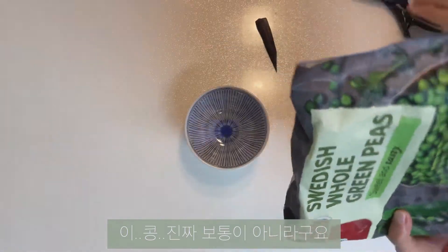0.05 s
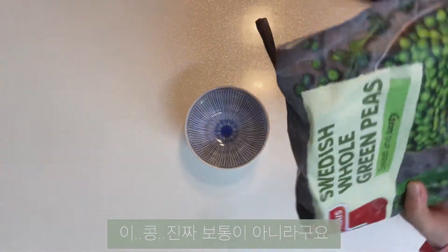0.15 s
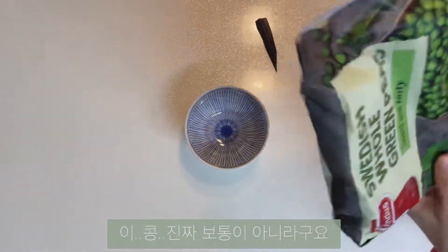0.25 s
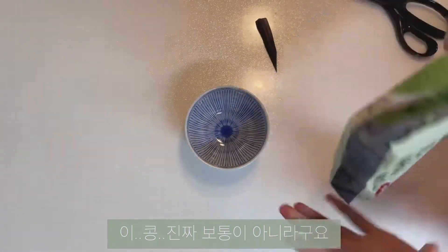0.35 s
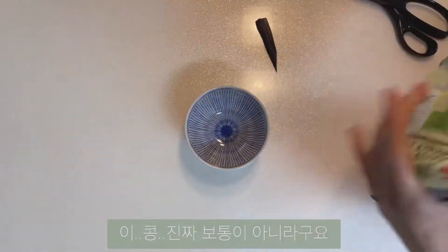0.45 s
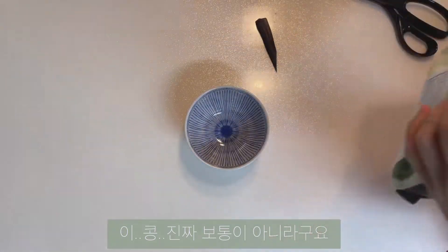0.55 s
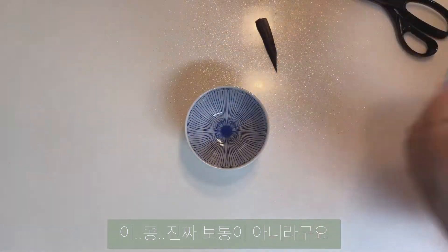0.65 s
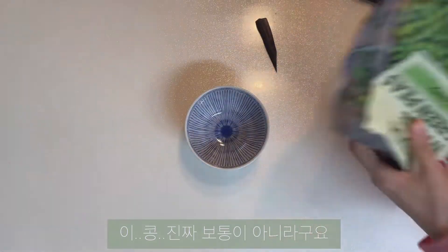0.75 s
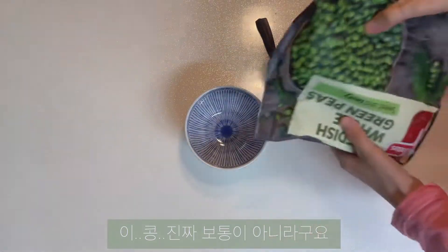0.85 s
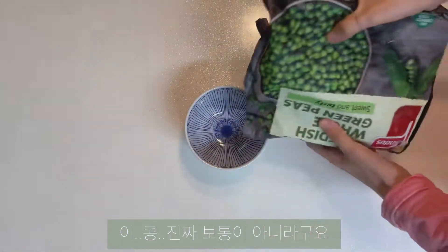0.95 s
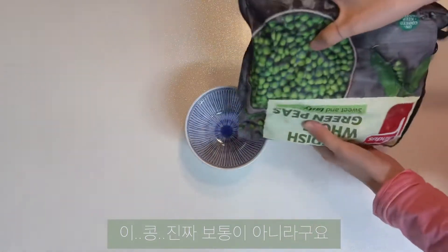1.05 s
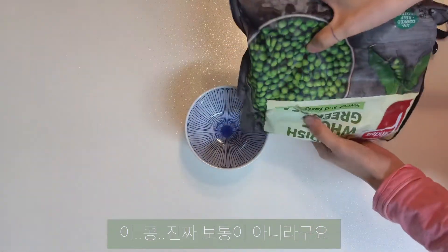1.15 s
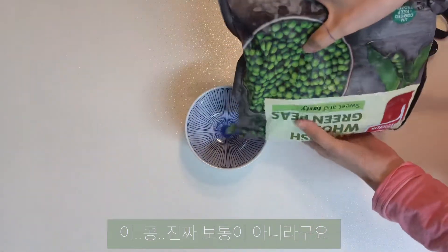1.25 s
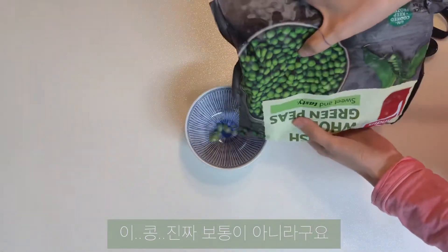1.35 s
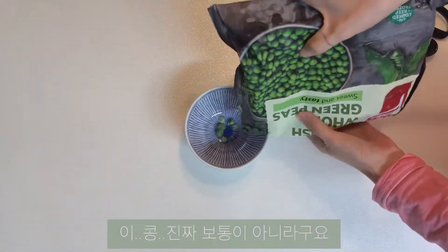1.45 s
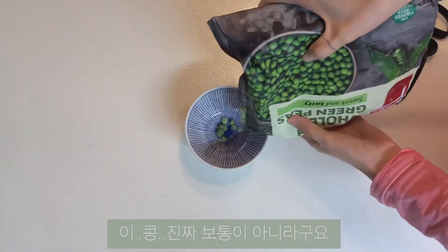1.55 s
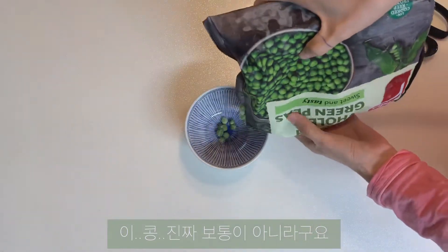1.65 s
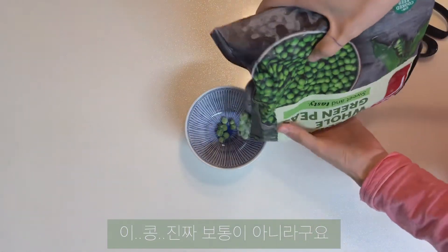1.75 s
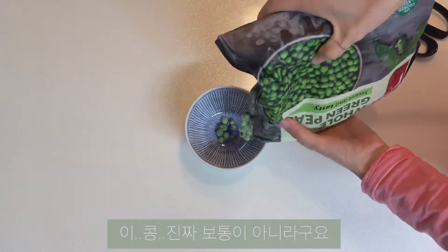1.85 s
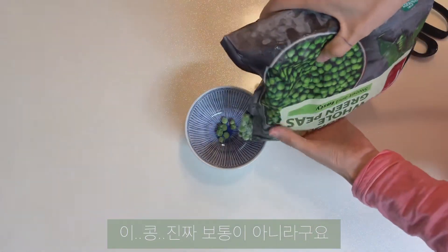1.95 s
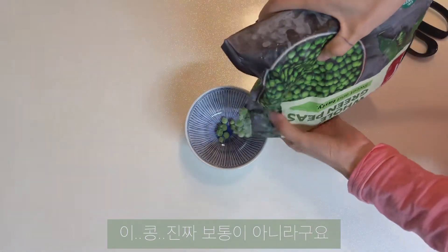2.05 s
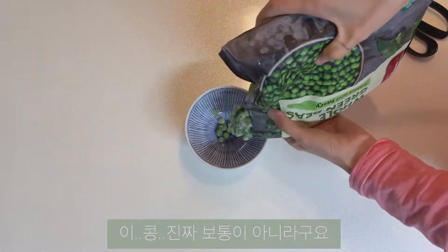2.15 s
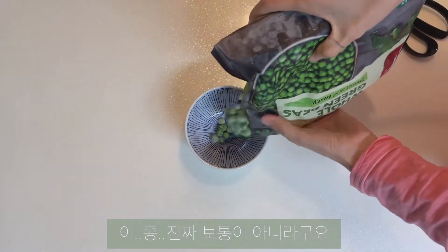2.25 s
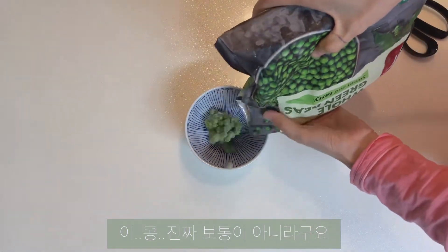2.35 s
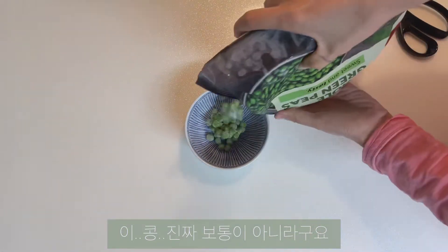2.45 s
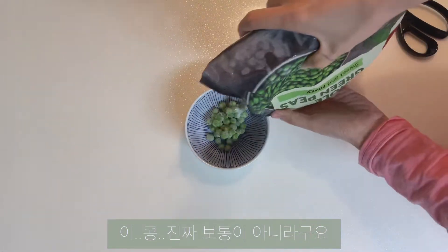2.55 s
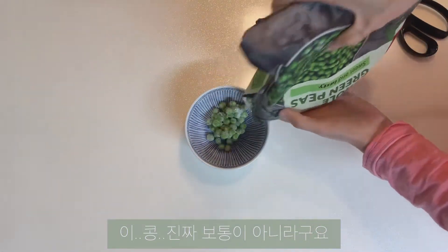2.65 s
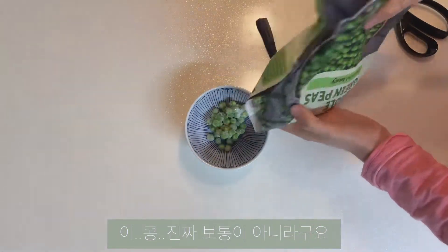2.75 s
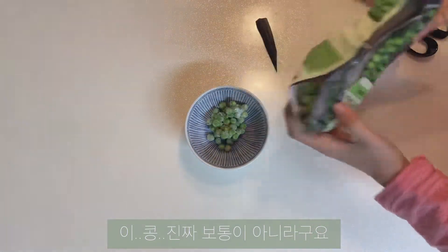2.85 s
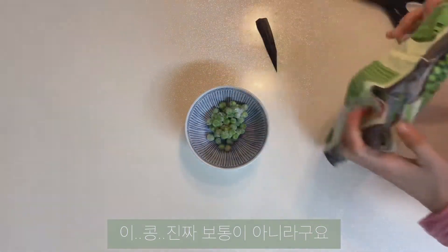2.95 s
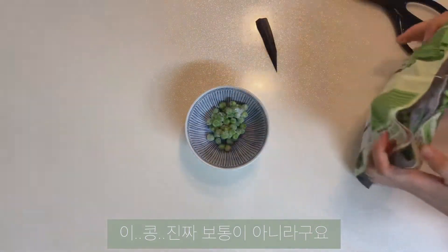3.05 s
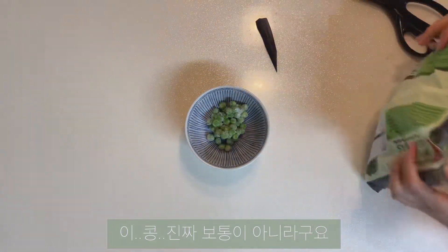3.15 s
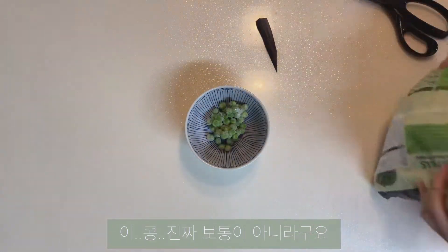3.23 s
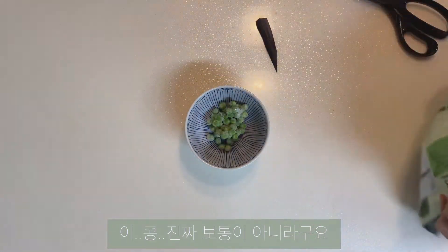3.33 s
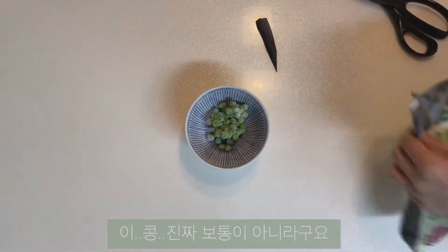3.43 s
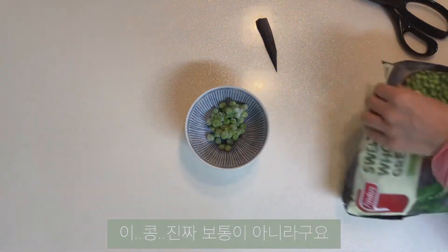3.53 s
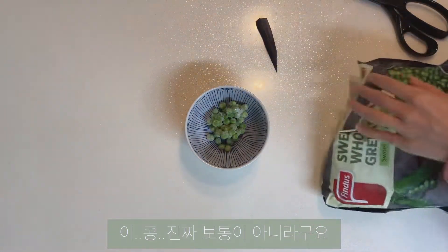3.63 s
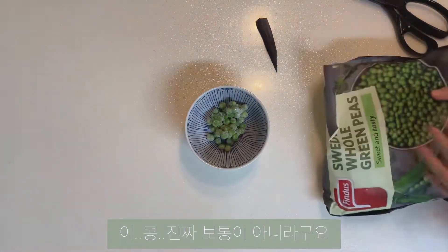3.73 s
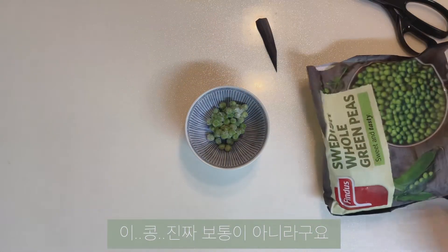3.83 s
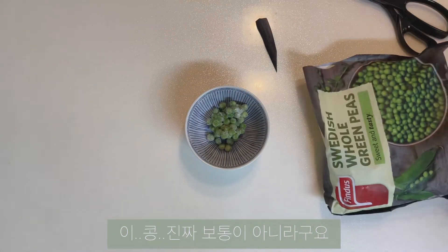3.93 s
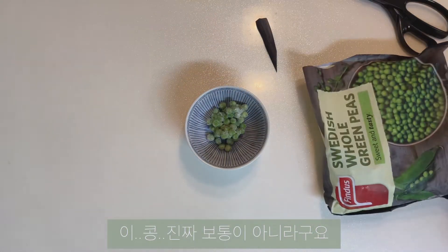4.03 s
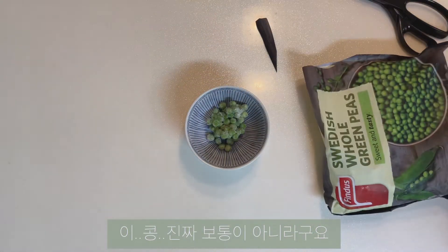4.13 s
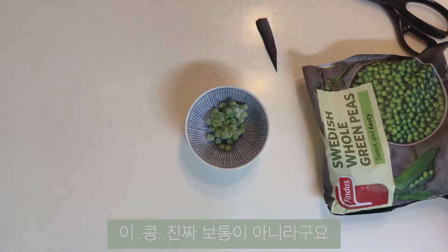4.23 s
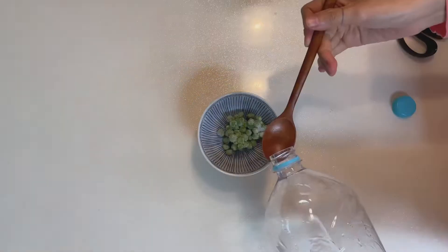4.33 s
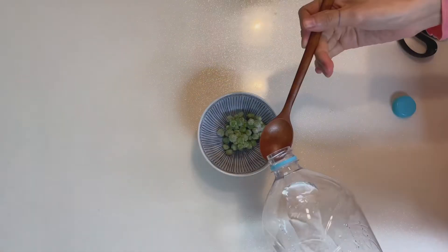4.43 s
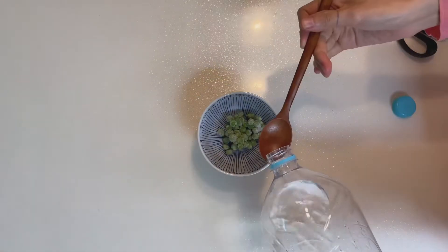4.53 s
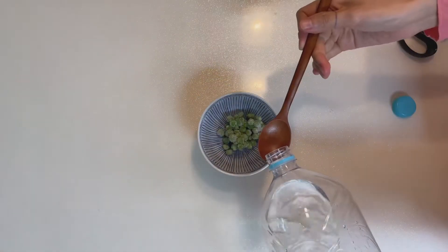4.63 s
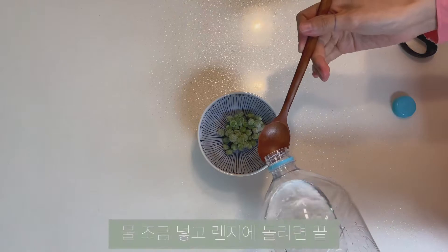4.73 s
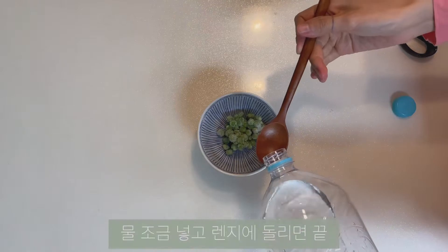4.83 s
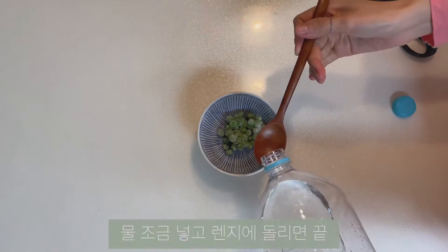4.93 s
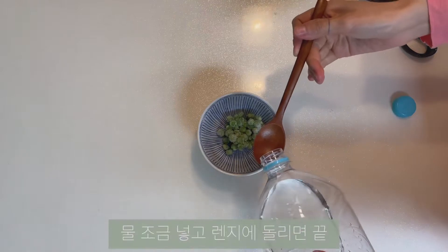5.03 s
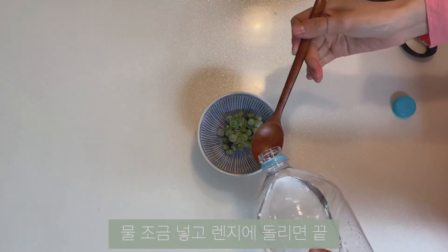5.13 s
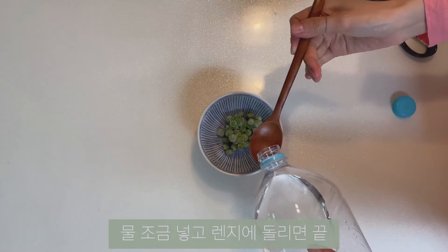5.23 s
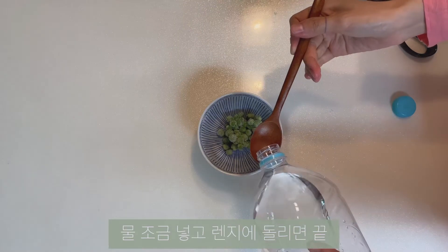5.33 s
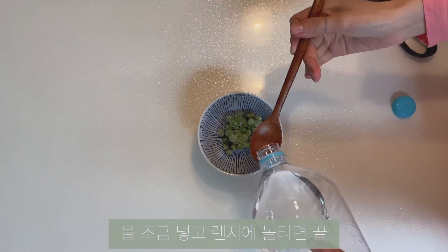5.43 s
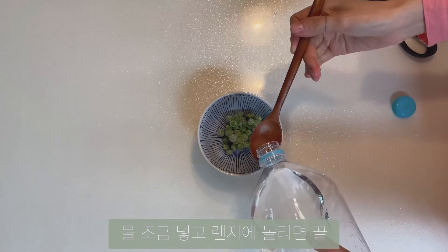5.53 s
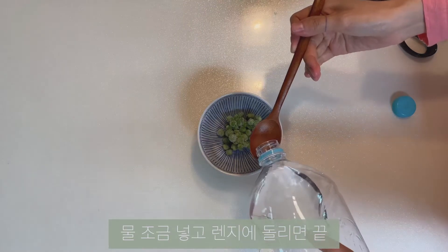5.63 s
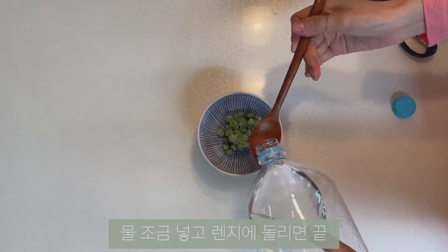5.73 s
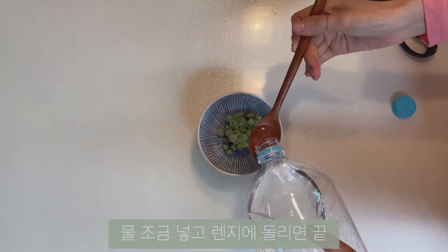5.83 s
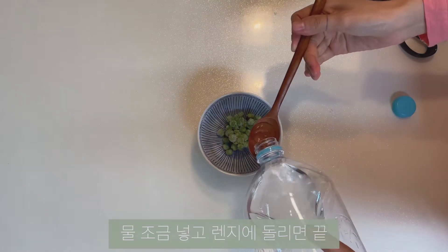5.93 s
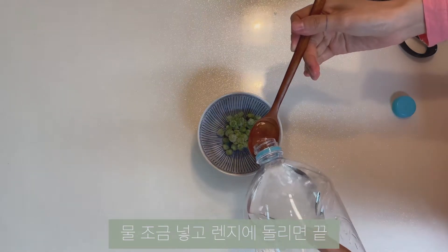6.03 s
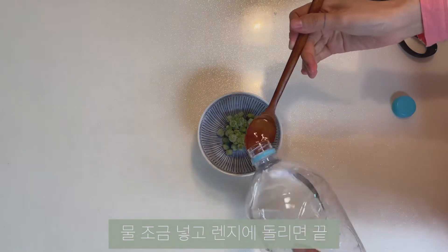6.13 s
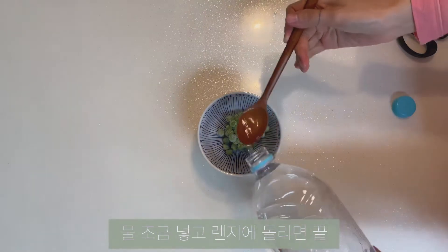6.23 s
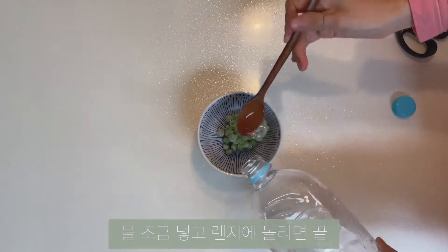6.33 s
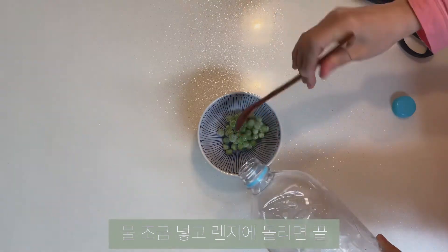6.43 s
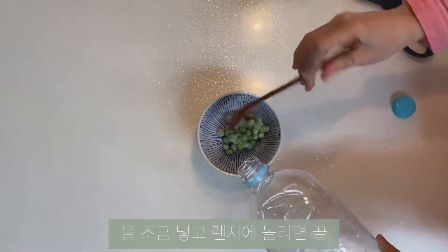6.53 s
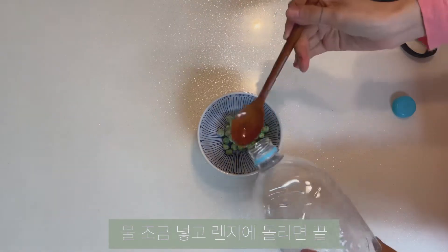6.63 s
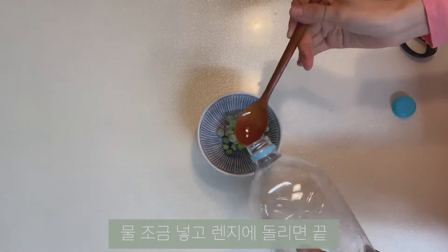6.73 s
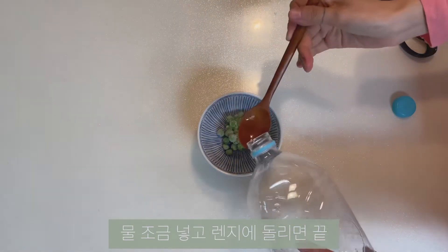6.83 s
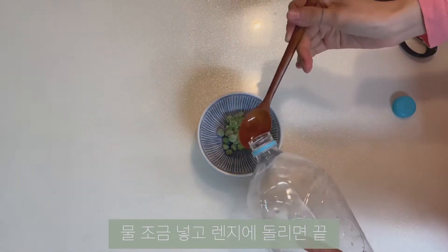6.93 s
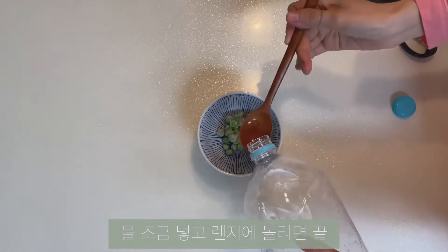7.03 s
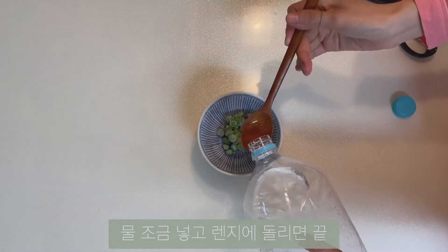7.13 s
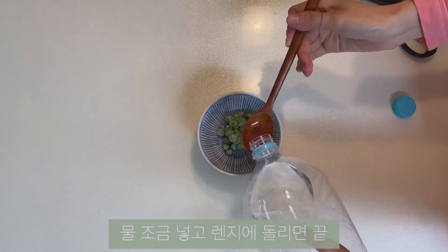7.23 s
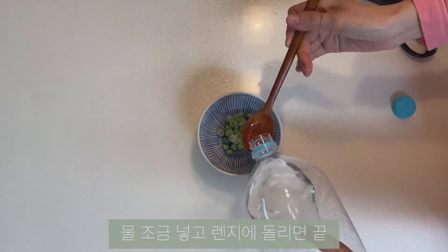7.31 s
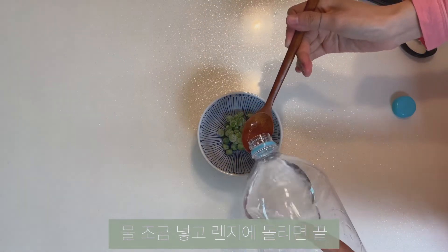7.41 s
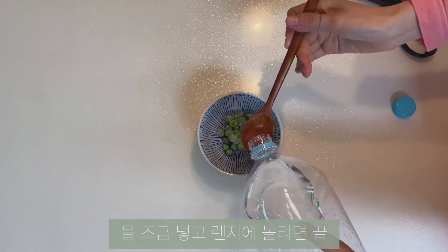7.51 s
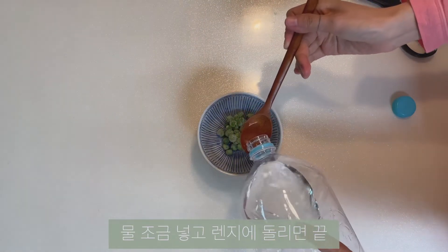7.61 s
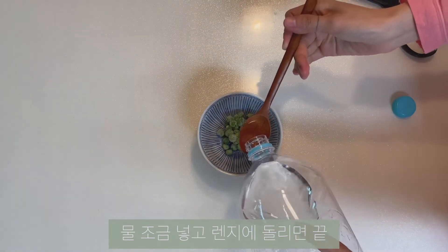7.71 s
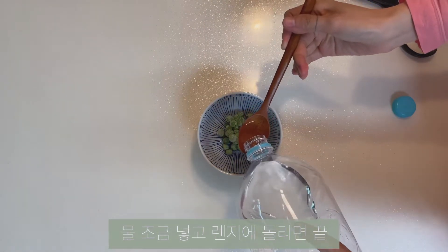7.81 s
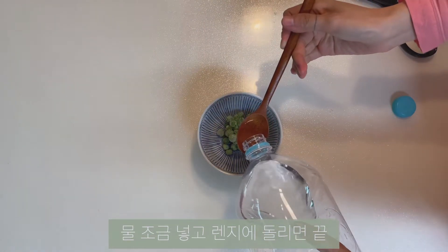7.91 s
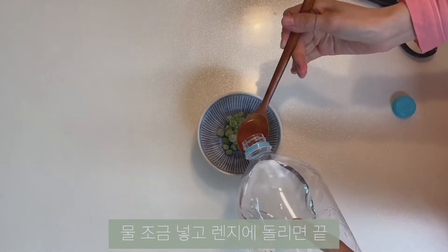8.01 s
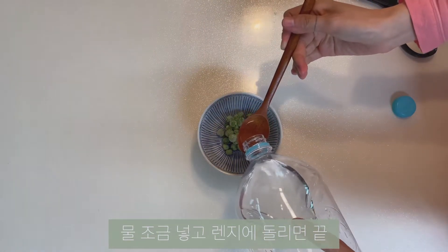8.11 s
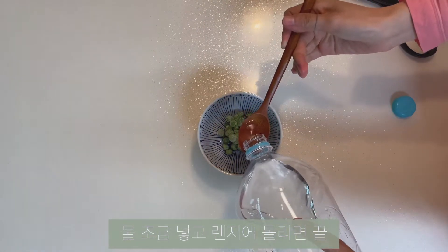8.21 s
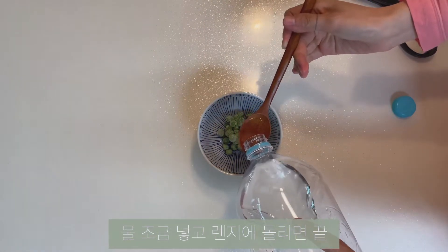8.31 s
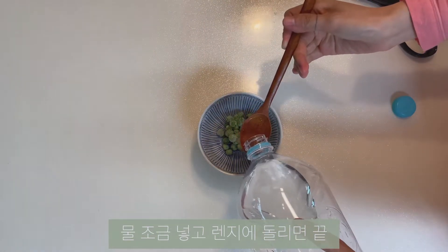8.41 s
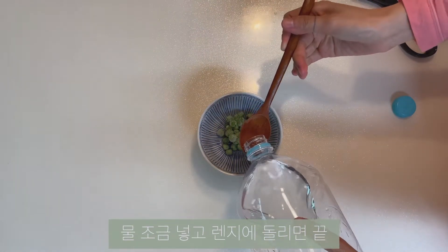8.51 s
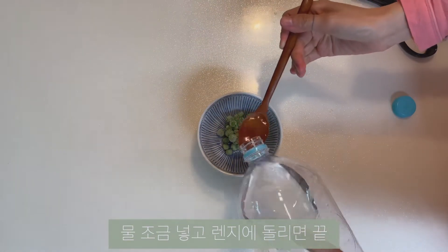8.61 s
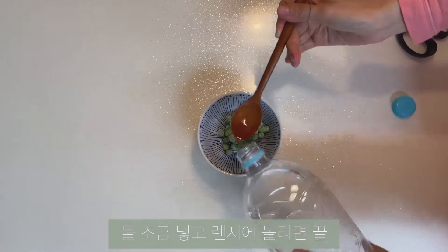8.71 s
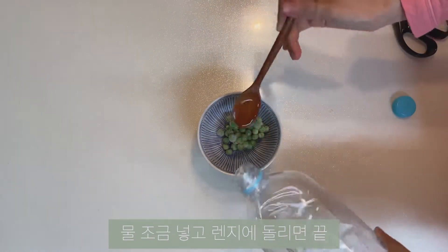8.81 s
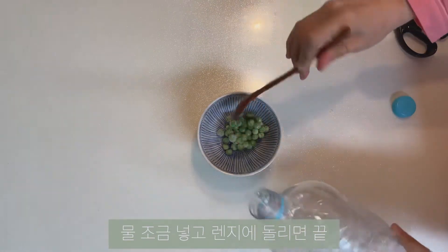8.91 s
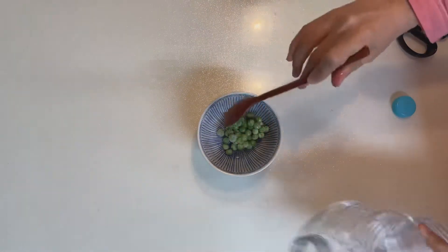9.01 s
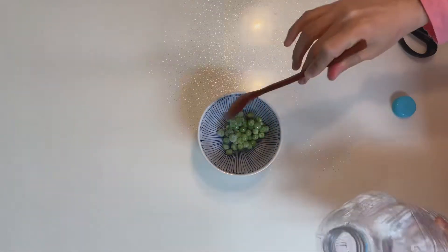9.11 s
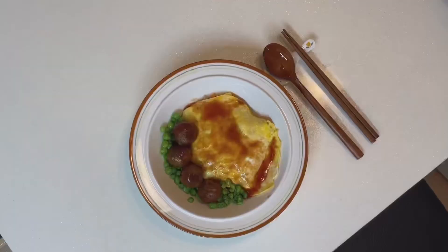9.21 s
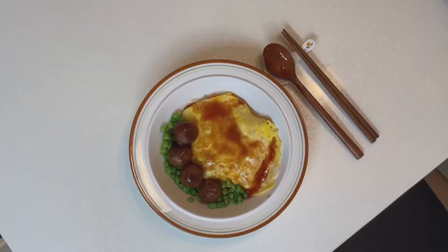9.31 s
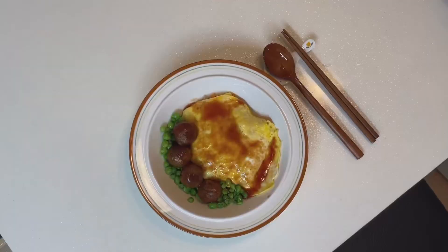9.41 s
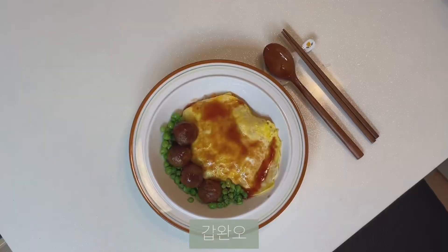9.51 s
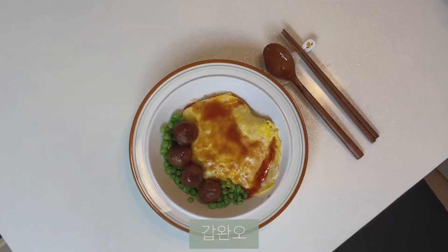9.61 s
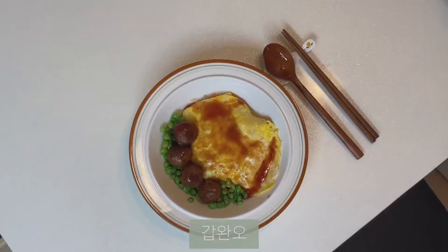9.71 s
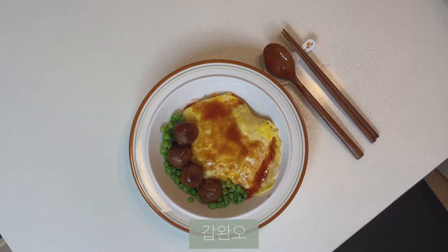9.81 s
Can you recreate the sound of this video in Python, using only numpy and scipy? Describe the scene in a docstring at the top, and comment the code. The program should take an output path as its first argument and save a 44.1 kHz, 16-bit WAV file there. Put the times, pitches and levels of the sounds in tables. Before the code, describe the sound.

In a small dry kitchen, hands squeeze and tip a plastic bag of frozen peas close to the microphone: dense, bright crackles and snaps, with two faint clear pings from a ceramic bowl. The bag is put down and falls quiet after four seconds. Later a wooden spoon taps and scrapes the bowl, a plastic bottle ticks and gulps once, and taps return near nine seconds. A low fridge hum stays underneath.

```python
"""A plastic bag of frozen peas crackles and snaps as it is squeezed, tipped and laid down: noise bursts.
Meanwhile two peas ring a small ceramic bowl: sine tones that die away, each damped by a later pea.
Then a water bottle ticks with short noises, a wooden spoon knocks and scrapes the bowl's rim (clicks, damped
tones and noise), and the bottle gulps once, a tone that slides down, before the last knocks and ticks.
A fridge hums throughout over dull air noise and faint hiss; near the end, from another spot, its hum is slower."""
import sys
import numpy as np
from scipy import signal
from scipy.fft import rfft, irfft, next_fast_len
from scipy.io import wavfile
from scipy.ndimage import uniform_filter1d

SR = 44100
rng = np.random.default_rng(int(sys.argv[2]) if len(sys.argv) > 2 else 0)


def transcribe(u):
    """Save the signal u as a 16-bit wav file named by the first command-line argument.

    u: samples, shape (n,) or (channels, n), limited to [-1, 1]; the rate is SR.
    q: integer samples, one column per channel.
    """
    v = np.clip(np.atleast_2d(u).T, -1, 1)
    q = np.round(v * 32767).astype(np.int16)
    wavfile.write(sys.argv[1], SR, q)


N = 434824


def amp(db):
    """Turn decibels into a gain."""
    return 10 ** (np.asarray(db) / 20)


def unit(x):
    """Scale a signal to an rms of 1."""
    return x / np.sqrt(np.mean(x ** 2) + 1e-20)


def along(points, hz):
    """Read a curve of (frequency [Hz], value) points on a log frequency axis."""
    point_hz, value = np.transpose(points)
    return np.interp(np.log(hz + 1), np.log(point_hz + 1), value)


def curves(rows):
    """Draw each column after the time as a curve with one value per sample."""
    times, *columns = np.transpose(rows)
    return [np.interp(np.arange(N) / SR, times, column) for column in columns]


def filtered(x, response):
    """Multiply the spectrum of x by a complex response of frequency."""
    size = next_fast_len(N + SR // 2)
    return irfft(rfft(x, size) * response(np.fft.rfftfreq(size, 1 / SR)), size)[..., :N]


def coloured(x, spectrum):
    """Give x the colour of a spectrum; white noise keeps its power."""
    return filtered(x, lambda hz: unit(amp(along(spectrum, hz))))


def add(track, s, sound):
    """Mix a sound into the track at a time in seconds."""
    track[round(s * SR):][:len(sound)] += sound


def around(hz, t, size):
    """Noise gathered near one frequency; a larger size makes the band narrower."""
    smooth = uniform_filter1d(rng.standard_normal(len(t)), size=size)
    smooth = uniform_filter1d(smooth, size=size)
    return unit(smooth) * np.sin(2 * np.pi * hz * t + 1)


def patchy(x, depth_db):
    """Short patches of the spectrum swell and sink at random; rms 1."""
    z = signal.stft(x, nperseg=128)[2]
    field = uniform_filter1d(rng.standard_normal(z.shape), size=6, axis=0)
    field = uniform_filter1d(field, size=4, axis=1)
    return unit(signal.istft(z * amp(depth_db * unit(field)), nperseg=128)[1][:N])


def crackle(spectrum, per_s, spread_db, life_s, smooth):
    """Random bursts, some louder than the rest, over a smooth share of noise; rms 1."""
    draw = rng.random((2, N))
    starts = (draw[0] < per_s / SR) * amp(-spread_db * np.log(draw[1] + 0.018))
    envelope = signal.lfilter([1], [1, -np.exp(-1 / (life_s * SR))], starts)
    noise = (unit(envelope) + smooth) * rng.standard_normal(N)
    return patchy(coloured(noise, spectrum), depth_db=3.0)


def struck(fade, noise):
    """Noise under a decay, with exactly the decay's energy."""
    return fade * noise * np.linalg.norm(fade) / np.linalg.norm(fade * noise)


def ringing(modes, t):
    """Every blow stirs the modes at new strengths; held loosely, they ring with wandering phases."""
    line_width_hz = 12
    steps = rng.standard_normal((len(modes), len(t)))
    wander = np.sqrt(2 * np.pi * line_width_hz / SR) * np.cumsum(steps, axis=1)
    out = np.zeros(len(t))
    for (hz, db, t60), drift in zip(modes, wander):
        out += amp(db + rng.normal(0, 1.5) - 60 * t / t60) * np.sin(2 * np.pi * hz * t + drift)
    return out


def stroke(s, length_s, db, rise, fall):
    """Gain that climbs to db at s, holds, then falls; slopes in dB per s."""
    t = np.arange(N) / SR - s
    return amp(db - rise * np.maximum(-t, 0) - fall * np.maximum(t - length_s, 0))


def hiss():
    """A very faint steady hiss: noise partly common to both channels."""
    # colour of the hiss: (frequency [Hz], relative level [dB])
    hiss_colour = [(2000, -21.5), (4000, 1), (8000, -2), (11000, 0.5), (12900, -0.5), (13500, -5.5),
                   (15500, -16.5)]
    shared, left, right = rng.standard_normal((3, N))
    return amp(-93.5) * unit(coloured(shared + 1.1 * np.array([left, right]), hiss_colour))


def fridge():
    """Steady multiples of the motor speed over dull air noise, a little different in each channel."""
    # strength of the hum's tones, one list per listening spot: (multiple of motor speed, relative level [dB])
    tones = [(1, -33), (2, 0), (3, -17.5), (4, -9.5), (5, -3), (6, -20.5), (7, -15), (8, -14), (9, -18.5),
             (10, -36.5), (11, -23), (12, -21.5), (13, -31.5), (14, -26.5), (15, -16), (16, -26),
             (17, -33.5), (18, -30.5), (19, -28.5), (20, -25), (21, -29.5), (22, -32.5), (23, -31),
             (24, -29), (25, -29), (27, -10), (28, -38.5), (29, -16.5), (30, -21)], [(1, -13), (2, 3),
             (3, -20), (4, -9), (5, -6.5), (6, -12), (7, -16), (8, -15.5), (9, -20), (10, -14), (11, -27.5),
             (12, -29.5), (13, -27.5), (14, -31.5), (15, -16.5), (16, -36.5), (17, -36), (18, -33),
             (19, -24), (20, -28.5), (21, -27.5), (22, -32.5), (23, -40), (25, -27), (26, -37), (27, -8),
             (28, -27), (29, -39), (30, -31.5)]
    # colour of the air noise, one list per listening spot: (frequency [Hz], relative level [dB])
    air_colour = ([(25, -46.5), (60, -30), (107, -8), (152, -5.5), (250, -8), (500, -12), (750, -14.5),
                  (900, -22.5), (1300, -25.5), (2300, -28), (2700, -33), (3500, -41.5), (4500, -60.5),
                  (6000, -95)], [(25, -29), (60, -14), (96, -0.5), (148, -10), (240, -13), (741, -23.5),
                  (1240, -28.5), (1900, -34), (2300, -44), (3000, -55), (5000, -94)])
    move_s = 9.165  # the listening spot changes
    # one value per spot:
    motor_hz, hum_level_db, air_level_db = (81.72, 49.03), (-60.5, -61), (-64, -62.5)
    pan_to_left_db = (-.3, 2.5)
    air_shared = (0.83, 0.4)  # noise common to both channels, against 1 for each one's own
    t, cycle = np.arange(N) / SR, np.linspace(0, 1, num=4097)
    moved = np.clip((t - move_s) / 0.003, 0, 1)
    out = np.zeros((2, N))
    for spot, pan_db in enumerate(pan_to_left_db):
        turn = np.zeros((2, len(cycle)))  # one revolution of the motor
        for k, db in tones[spot]:
            # higher tones differ more between left and right
            lean = np.tanh((k * motor_hz[spot] / 1400) ** 2) * np.array([[1], [-1]])
            phase = 2 * np.pi * (k * cycle + rng.random()) + 1.145 * lean
            turn += amp(db + 4.24 * lean) * np.sin(phase)
        hum = np.array([np.interp(motor_hz[spot] * t % 1, cycle, row) for row in turn])
        shared, left, right = rng.standard_normal((3, N))
        noise = np.array([left, right]) + air_shared[spot] * shared
        air = unit(coloured(noise, air_colour[spot]))
        here = moved if spot else 1 - moved
        pan = amp([[pan_db], [-pan_db]])
        out += here * pan * (amp(hum_level_db[spot]) * unit(hum) + amp(air_level_db[spot]) * air)
    return out


def bottle():
    """Plastic ticks are tiny bright noises; the one gulp is a tone whose pitch holds, then slides down."""
    # small ticks of the plastic: (time [s], level before the fade [dB], centre [Hz])
    ticks = [(4.3094, -64, 6940), (4.9354, -58, 9100), (5.2761, -52, 8440), (6.3574, -50, 12560),
             (6.3644, -46, 7100), (6.3854, -58, 7630), (6.395, -52, 7100), (6.4733, -49, 7400),
             (6.488, -60, 8500), (6.5555, -61, 9770), (7.0023, -55, 12970), (7.1149, -67, 10230),
             (8.8605, -56, 8040), (8.864, -41.5, 11000), (8.8695, -50, 13000), (8.873, -43, 10200),
             (8.8932, -42, 14300), (8.8942, -45, 8450), (8.9002, -54, 8000), (8.9226, -34, 9900),
             (8.978, -41, 12100), (9, -42, 10000), (9.0544, -63, 10950), (9.1444, -68, 7950),
             (9.7826, -61, 6035)]
    tick_t60_s = 0.006
    gulp_s, gulp_length_s, gulp_db, gulp_fade = 7.028, 0.105, -57, 15  # fade in dB per s
    gulp_hz, hold_s, sag_octaves_per_s = 945, 0.037, 27
    out, t = np.zeros(N + SR), np.arange(3000) / SR
    for s, db, hz in ticks:
        fade = amp(db - 60 * t / tick_t60_s) * (1 - np.exp(-t / 0.00011))
        add(out, s, fade * around(hz, t, size=10))
    t = np.arange(round(gulp_length_s * SR)) / SR
    sagging = .007 * np.logaddexp(0, (t - hold_s) / .007)  # the slide sets in gently
    turn = 2 * np.pi * np.cumsum(gulp_hz * 2 ** (-sag_octaves_per_s * sagging)) / SR
    flutter = 1 + 0.25 * unit(uniform_filter1d(rng.standard_normal(len(t)), size=400))
    ends = np.clip(np.minimum(t / 0.0026, (t[-1] - t) / 0.017), 0, 1)
    add(out, gulp_s, amp(gulp_db - gulp_fade * t) * ends * flutter * np.sin(turn))
    return out[:N]


def spoon():
    """Wood on ceramic: a click, rim modes near its colour, a hollow cup note, a bright crack; also scrapes."""
    # spoon contacts: (time [s], click [dB], click centre [Hz], ring of the rim [dB],
    # hollow knock [dB], its note [Hz], treble [dB]); levels before colour and fades
    knocks = [(6.1469, -58, 1880, -53, -59, 735, -71), (6.1636, -53.5, 2120, -57, -59.5, 727, -75.5),
              (6.1851, -46, 2750, -63, -41.5, 706, -50), (6.4158, -53, 2870, -58, -58, 717, -47),
              (6.4326, -45.5, 1054, -39, -45.5, 757, -38.5), (6.6349, -36, 2930, -56, -41.5, 678, -48.5),
              (6.717, -36.5, 1956, -45.5, -48, 700, -40.5), (6.726, -37.5, 1520, -53, -50, 229, -47),
              (6.8567, -42.5, 2494, -58, -45.5, 762, -61.5), (8.6226, -53, 1436, -63, -53, 734, -89.5),
              (8.867, -61, 2920, -59, -65, 720, -59), (8.9, -60, 3220, -61.5, -68, 720, -66),
              (8.9226, -57, 1500, -61, -56, 740, -45), (8.9394, -51, 3060, -59, -67, 725, -51),
              (8.965, -39, 4180, -43.5, -55, 720, -63), (8.9765, -52, 4300, -56, -67, 710, -60),
              (8.9814, -58, 1330, -48, -34, 737, -58), (9.0264, -54, 1320, -56, -63, 697, -62),
              (9.054, -63, 4240, -69, -72, 715, -75)]
    # tones of the spoon's cup: (multiple of its note, relative level [dB], time to fall 60 dB [s])
    cup_tones = [(.33, -17, 0.076), (.65, -7.5, 0.054), (1, 5, 0.087), (1.28, -2, 0.052), (1.95, -6, 0.043)]
    # the damped rim: (frequency [Hz], relative level [dB], time to fall 60 dB [s] at the firmest contact)
    rim_modes = [(1012, 4, 0.042), (1080, -14, 0.057), (1272, -3.5, 0.17), (1466, 0, 0.067),
                 (1854, 1, 0.078), (2430, 10, 0.064), (2610, -9, 0.1), (3000, 14, 0.045), (3340, -3, 0.025),
                 (3790, 16, 0.03), (4460, 17, 0.046), (4800, -8, 0.049)]
    # scrapes on the rim: (time [s], length [s], level before the noise parts are summed [dB])
    scrapes = [(6.148, 0.034, -77), (6.365, 0.0092, -76.5), (6.433, .012, -63), (8.842, .02, -69.5),
               (8.925, 0.027, -68), (8.962, 0.05, -66)]
    # colour of the wood: (frequency [Hz], relative level [dB])
    wood_colour = [(250, -30), (800, 3), (2000, 3), (3500, -1), (5000, 3), (7000, -24)]
    # colour of the spoon's treble on the glaze: (frequency [Hz], relative level [dB])
    glaze_colour = [(2500, -11), (4200, 5), (8000, 0), (10000, -6.5), (12500, -11.5), (15500, -17)]
    click_t60_s = 0.013  # at 2 kHz, longer for lower clicks
    rim_reach_db = 37.5  # a mode loses this much per octave from the centre of the click
    light_damping = 0.21  # dB of ring time lost per dB that a contact is lighter than the firmest
    firmest_db = max(row[3] for row in knocks)
    out, wood, bright = np.zeros((3, N + SR))
    t = np.arange(SR // 5) / SR
    for s, click_db, hz, rim_db, hollow_db, note_hz, treble_db in knocks:
        burst = rng.standard_normal((2, len(t)))
        fade = amp(-3 - 60 * t / 0.0031)
        fade += amp(-60 * t / (click_t60_s * np.sqrt(2000 / hz)))
        fade += amp(-17.0 - 60 * t / 0.19)
        click = struck(fade, 0.88 * burst[0] + 0.37 * around(hz, t, size=18))
        add(wood, s, amp(click_db) * click)
        lasts = amp(light_damping * (rim_db - firmest_db))
        near = [(f, db - rim_reach_db * abs(np.log2(f / hz)), t60 * lasts) for f, db, t60 in rim_modes]
        add(out, s, amp(rim_db) * (1 - np.exp(-t / 0.00073)) * ringing(near, t))
        cup = [(k * note_hz, db, t60) for k, db, t60 in cup_tones]
        swell = 1 - np.exp(-t / 0.0045)
        add(out, s, amp(hollow_db) * swell * ringing(cup, t))
        add(bright, s, amp(treble_db - 60 * t / 0.016) * burst[1])
    strokes = sum(stroke(*row, rise=630, fall=330) for row in scrapes)
    treble_scrape = crackle(glaze_colour, per_s=200, spread_db=1, life_s=0.0014, smooth=0.49)
    dull_scrape = amp(-1) * crackle(wood_colour, per_s=160, spread_db=6, life_s=0.002, smooth=0.4)
    scrape = strokes * (treble_scrape + dull_scrape)
    return out[:N] + coloured(wood[:N], wood_colour) + coloured(bright[:N], glaze_colour) + scrape


def bowl():
    """The glazed bowl rings as clean fading tones until another pea lands on it and damps them."""
    # a pea rings the bowl: (time [s], level [dB], time when the next pea damps it [s])
    pings = [(2.33, -45.5, 2.38), (2.47, -41, 2.553)]
    # tones of the bowl: (frequency [Hz], level over the ping's [dB], time to fall 60 dB if undamped [s])
    bowl_tones = [(3025, -11, 0.4), (3092, -9, 0.25), (7378, 0.5, 0.93), (13188, -2, 0.13),
                  (13242, -1, 0.16)]
    out, t = np.zeros(N + SR), np.arange(SR // 4) / SR
    for s, db, stop in pings:
        ring = sum(amp(level - 60 * t / t60) * np.sin(2 * np.pi * hz * t) for hz, level, t60 in bowl_tones)
        damping_db = 60 * np.maximum(t - (stop - s), 0) / 0.015
        add(out, s, amp(db - damping_db) * ring)
    return out[:N]


def bag():
    """Film, peas and bag body crackle under the hands; a snap excites all three, the low parts lasting longer."""
    # the hands working the bag: (time [s], film crackle before hushes [dB], body of the bag over the film [dB])
    handling = [(0, -53.5, 9), (.045, -45, 1), (.08, -36.5, -3.5), (.185, -46.5, -0.5), (.215, -30.5, -8),
                (.27, -30, -9.5), (.37, -38, -5.5), (.45, -34, -6.5), (.57, -37.5, -11.5), (.6, -52, -4),
                (.63, -40, -2.5), (.77, -42, -6.5), (.82, -37, -6.5), (.855, -45, -3), (.9, -35, -7),
                (1.01, -43.5, -6), (1.08, -33.5, -5.5), (1.13, -40, 1), (1.17, -37.5, -6),
                (1.24, -38.5, -3.5), (1.32, -37, -7), (1.37, -51, -1), (1.55, -34.5, -8), (1.62, -40.5, -5),
                (1.84, -42.5, -4), (1.9, -56, 1), (1.96, -41.5, -8), (2.06, -29.5, -12.5), (2.18, -59, -2),
                (2.22, -39.5, -5), (2.275, -54, 1), (2.33, -58.5, 11.5), (2.37, -47.5, -11),
                (2.41, -37.5, -6.5), (2.55, -61.5, 5), (2.75, -45, -7), (2.86, -39.5, -8),
                (2.98, -35.5, -11.5), (3.015, -33.5, 1), (3.06, -45.5, -6), (3.2, -49.5, -1),
                (3.235, -38, -3), (3.36, -47.5, -11), (3.43, -43, -1), (3.46, -37, -2), (3.54, -41, -5.5),
                (3.59, -36.5, -3), (3.77, -48.5, -6), (3.83, -43.5, -2), (3.92, -64, -12), (4.0, -71, -10),
                (4.09, -69, 3), (4.16, -102, 18.5)]
    # loudest folds of the film snapping through: (time [s], sharp edge [dB], slap [dB], thump [dB],
    # centre of the slap [Hz]); levels before colour
    loud_snaps = [(0.0115, -20.5, -40, -37, 2300), (0.0343, -30.5, -33.5, -36, 1520),
                  (0.04, -9.5, -22.5, -32.5, 2623), (0.0662, -16.5, -34, -37, 1290),
                  (0.1138, -15.5, -41, -42.5, 2490), (0.164, -21.5, -31.5, -40, 2390),
                  (0.1923, -29, -38.5, -45, 3230), (0.2092, -24.5, -37, -36, 2970),
                  (0.2229, -20, -36, -39, 3030), (0.2597, -15.5, -32, -37, 3630),
                  (0.279, -13, -52, -33.5, 2360), (0.2856, -27.5, -50, -38, 2340),
                  (0.308, -16, -42, -42.5, 3020), (0.3753, -14, -49, -40, 2500),
                  (0.398, -15.5, -45, -42, 3000), (0.4231, -24, -51, -26.5, 1380),
                  (0.4362, -15.5, -32.5, -45, 3040), (0.5038, -28.5, -34, -40.5, 2610),
                  (0.5581, -15, -45, -37.5, 990), (0.5731, -22, -40, -43, 2660),
                  (0.605, -28, -43, -50.5, 3040), (0.6271, -17, -41, -39, 1120),
                  (0.6625, -17, -31.5, -43, 2960), (0.7041, -15.5, -39, -47, 2490),
                  (0.7766, -26, -33.5, -44.5, 2600), (0.7929, -24, -37, -36, 1180),
                  (0.8103, -17, -28.5, -38.5, 1300), (0.8796, -19.5, -31, -45.5, 3770),
                  (0.8989, -24.5, -29, -38, 1300), (0.9224, -26.5, -28, -39.5, 2670),
                  (0.9603, -30.5, -30.5, -42, 1166), (0.9783, -19.5, -31, -47, 3040),
                  (0.9821, -15.5, -27.5, -44.5, 1910), (1.0192, -25, -30.5, -51, 1900),
                  (1.0372, -14.5, -35, -50.5, 1170), (1.058, -26, -31, -31.5, 2390),
                  (1.064, -14, -26, -43, 2390), (1.0762, -12, -28.5, -42.5, 2870),
                  (1.145, -25, -32, -34.5, 2520), (1.1617, -17, -32, -40.5, 2400),
                  (1.1647, -18, -28, -38, 2600), (1.229, -22.5, -35.5, -49, 2400),
                  (1.271, -23, -31, -43.5, 3630), (1.2846, -20, -29, -42.5, 2290),
                  (1.2892, -14, -34.5, -36, 2360), (1.3117, -16, -31.5, -37, 1980),
                  (1.32, -15.5, -32, -45.5, 2220), (1.3324, -19, -27.5, -47, 1880),
                  (1.4039, -23.5, -45, -56, 1520), (1.4298, -28, -38, -49.5, 1940),
                  (1.4388, -20.5, -31.5, -44, 3050), (1.5113, -23.5, -31.5, -32, 2200),
                  (1.548, -17, -30, -43, 2390), (1.5853, -19, -39, -60, 2340),
                  (1.679, -14.5, -33, -36.5, 1960), (1.713, -15, -38, -47, 2490),
                  (1.74, -25, -47, -47, 2160), (1.7645, -21, -31.5, -46, 1890),
                  (1.78, -16.5, -37, -43, 2380), (1.8481, -14.5, -36, -44.5, 2510),
                  (1.8848, -26.5, -40, -49, 2530), (1.933, -23.5, -34.5, -36, 1550),
                  (1.9542, -21, -33.5, -44, 1480), (1.9649, -30, -34, -39.5, 2510),
                  (1.9953, -17.5, -38, -49, 1950), (2.0143, -25, -38, -51.5, 1190),
                  (2.0273, -21, -29.5, -46, 3670), (2.0401, -16.5, -31, -36, 1950),
                  (2.0564, -16, -33.5, -40.5, 2590), (2.1244, -27, -41, -58, 1920),
                  (2.1985, -32, -44, -41.5, 2500), (2.2127, -21.5, -49, -39, 2960),
                  (2.2193, -24, -37, -48.5, 2420), (2.2873, -25.5, -28, -35, 2670),
                  (2.3138, -39, -29.5, -38.5, 2425), (2.328, -26, -38, -51, 2400),
                  (2.339, -36, -43, -61, 2810), (2.3824, -31, -41, -45, 2240), (2.402, -18, -38, -41, 1150),
                  (2.4138, -16.5, -38, -48, 2760), (2.5521, -24.5, -47.5, -53, 2400),
                  (2.5753, -34, -39.5, -58, 2380), (2.6076, -34.5, -37.5, -53, 2500),
                  (2.6669, -23.5, -38, -49, 1600), (2.677, -30, -47, -55, 2260),
                  (2.706, -32, -39.5, -48, 2030), (2.8779, -22, -40, -41, 2920),
                  (2.9589, -22, -30.5, -44, 2480), (2.998, -20, -29, -46, 2430),
                  (3.0045, -8, -23.5, -36, 3170), (3.0104, -15.5, -34, -34, 3200),
                  (3.223, -25, -34, -50.5, 2520), (3.2329, -17, -33, -48, 3670),
                  (3.3098, -21, -45, -40, 2470), (3.3839, -22.5, -37, -39.5, 2980),
                  (3.44, -24.5, -24.5, -23.5, 1167), (3.484, -27, -41, -37.5, 2930),
                  (3.5643, -16, -33, -42.5, 1350), (3.6135, -26, -42, -41.5, 2230),
                  (3.6388, -21.5, -37, -52, 1620), (3.658, -33, -33, -61, 1390),
                  (3.7015, -21, -45, -43.5, 3750), (3.8105, -30, -39, -44, 1580),
                  (3.8645, -44, -41.5, -54, 2430), (3.897, -33, -43, -48.5, 1180),
                  (4.024, -48, -59, -58, 3510), (4.071, -40, -49, -58, 3380)]
    # colours of the film, the peas, the bag's body and the slaps: (frequency [Hz], relative level [dB])
    film_colour = [(3000, -37), (4200, 1.5), (6000, -3), (8000, -4), (11000, -5), (13500, -4.5),
                   (15500, -8.5)]
    peas_colour = [(900, -45), (1400, -5.5), (1900, 0), (2450, 3.5), (3000, 1), (4000, -0.5), (5500, -23.5)]
    body_colour = [(30, -60), (70, -22), (150, -7), (300, -3), (660, 0.5), (1000, -1.5), (1500, -3.5),
                   (2500, -23.5)]
    slap_colour = [(450, -31), (950, -1.5), (2400, 0), (4000, -1), (5500, -26.5)]
    peas_db, peas_follow = -1, 0.3  # sliding peas over the film; share of the body's swing that they follow
    hush_depth_db, hush_s = -3, 0.0095  # the film stiffens and the rustle sinks just before a loud snap
    small_snaps = 30  # lesser snaps, at random while the bag is handled
    small_db, small_spread_db = (9.5, 1.5, 3), 1  # edge, slap and thump over their rustle; scatter
    edge_range_hz = (5500, 14000)  # an edge is brightest somewhere in this range
    small_slap_hz = (1206, 3530)  # range for the centre of a lesser slap
    fold_s, fold_db = 0.0012, 5  # a slap is a clump of small folds: their length, scatter of their strength

    film_db, over_db = curves(handling)
    levels = film_db + np.array([0 * over_db, peas_db + peas_follow * over_db, over_db])
    end = round(handling[-1][0] * SR)
    before = np.array([row[0] for row in loud_snaps])[:, None] - np.arange(end) / SR
    hush_db = hush_depth_db * np.max(np.exp(-np.abs(before) / hush_s) * (before > 0), axis=0)
    film, peas, body = np.pad(amp(levels[:, :end] + hush_db), ((0, 0), (0, N - end)))
    rustle = film * crackle(film_colour, per_s=740, spread_db=7.5, life_s=0.0004, smooth=0.98)
    rustle += peas * crackle(peas_colour, per_s=610, spread_db=3, life_s=.001, smooth=1.0)
    rustle += body * crackle(body_colour, per_s=230, spread_db=5.5, life_s=.003, smooth=1.0)

    small = []
    for share in rng.random(small_snaps):
        snap_db = levels[:, int(share * end)] + small_db + small_spread_db * rng.standard_normal(3)
        small.append((share * end / SR, *snap_db, rng.uniform(*small_slap_hz)))

    edge, slap, thump = np.zeros((3, N + SR))
    t = np.arange(3000) / SR
    # a spike, then the fold settles
    spike = (1 - np.exp(-t / .0006)) * (amp(-60 * t / .004) + amp(-21 - 60 * t / .025))
    slap_fade = amp(-60 * t / 0.015) + amp(-10.0 - 60 * t / 0.038)
    thump_fade = amp(-60 * t / 0.025) + amp(-8.5 - 60 * t / 0.089)
    for s, edge_db, slap_db, thump_db, slap_hz in [*loud_snaps, *small]:
        burst = rng.standard_normal((3, len(t)))
        folds = amp(fold_db * np.interp(t / fold_s, np.arange(100), rng.standard_normal(100)))
        crack = spike * (1.2 * burst[0] + 0.78 * around(rng.uniform(*edge_range_hz), t, size=7))
        add(edge, s, amp(edge_db) * crack / np.abs(crack).max())
        clump = folds * (0.73 * burst[1] + 0.58 * around(slap_hz, t, size=30))
        add(slap, s, amp(slap_db) * (1 - np.exp(-t / 0.00068)) * struck(slap_fade, clump))
        add(thump, s, amp(thump_db) * struck(thump_fade, burst[2]))
    snaps = coloured(edge[:N], film_colour) + coloured(slap[:N], slap_colour)
    return rustle + snaps + coloured(thump[:N], body_colour)


def echoes(x):
    """The kitchen's answer: a new random tail for each third of a second; each frequency dies at its own speed."""
    # how fast the room falls silent: (frequency [Hz], time to fall 60 dB [s])
    room_decay = [(200, 0.096), (2000, 0.071), (10000, 0.079)]
    out, step = np.zeros(N + 2 * SR), SR // 3
    for start in range(0, N, step):
        hz, t, z = signal.stft(rng.standard_normal(SR // 3), SR, nperseg=256)
        fading = z * amp(-60 * t / along(room_decay, hz)[:, None])
        tail = signal.istft(fading, SR, nperseg=256)[1]
        answer = signal.fftconvolve(x[start:start + step], tail / np.linalg.norm(tail))
        add(out, start / SR + .002, answer)
    return out[:N]


def ports(x):
    """Two close ports share direct sound and echoes; a scattered part differs, and timing and level vary by pitch."""
    # how alike left and right are: (frequency [Hz], likeness [0 to 1])
    alike = [(150, 0.55), (520, 0.86), (900, 0.43), (2000, 0.14), (3300, 0.3), (4300, 0.92), (4900, 0.96),
             (5900, 0.98), (6500, 0.88), (8300, 0.99), (13000, .9), (14500, 1)]
    # how far the right port leads: (frequency [Hz], phase [radians])
    right_lead = [(500, -.4), (2500, -.3), (3400, 1.1), (4300, 2.4), (5000, 3.08), (5800, 3.22),
                  (6900, 5.1), (7800, 6.28)]
    # what the left port gains and the right loses: (frequency [Hz], level [dB])
    left_gain = [(500, -0.6), (1200, 1.5), (1600, -0.4), (2700, -2), (3400, -0.5), (9000, -0.26),
                 (12000, -0.45)]
    side = np.array([[1], [-1]])
    shared, apart = x + amp(-8) * echoes(x), echoes(x)

    def spread(hz):
        """Angle that splits the sound between shared and scattered parts."""
        return np.arccos(np.clip(along(alike, hz), 0, 1)) / 2

    def port(hz):
        """Response of each port, with its phase and level."""
        bass = hz ** 2 / (hz ** 2 + 70 ** 2)  # the small ports pass little deep bass
        return bass * np.exp(-.5j * side * along(right_lead, hz)) * amp(side * along(left_gain, hz))

    together = filtered(shared, lambda hz: np.cos(spread(hz)) * port(hz))
    return together + filtered(apart, lambda hz: side * np.sin(spread(hz)) * port(hz))


def scene():
    """Bag, bowl, spoon and bottle sound in the room; hum and hiss are added straight to both channels."""
    return ports(bag() + bowl() + spoon() + bottle()) + fridge() + hiss()


def record(dry):
    """Fade out the treble just below a band limit and keep nothing above it."""
    top_hz = 15900
    return filtered(dry, lambda hz: np.clip((top_hz - hz) / 150, 0, 1))


dry = scene()
out = record(dry)
transcribe(out)
```